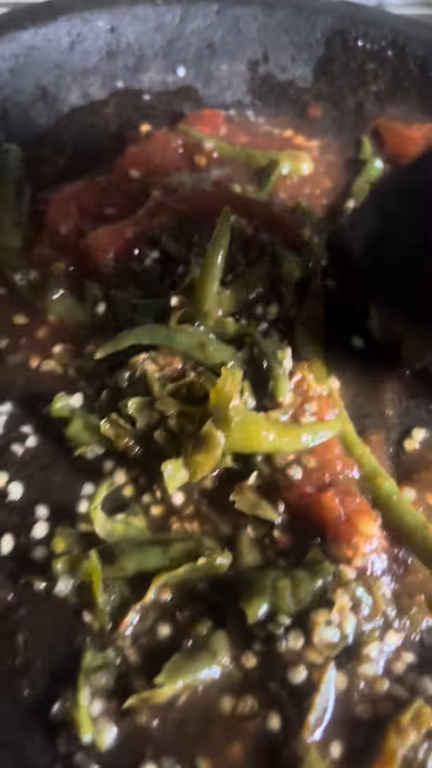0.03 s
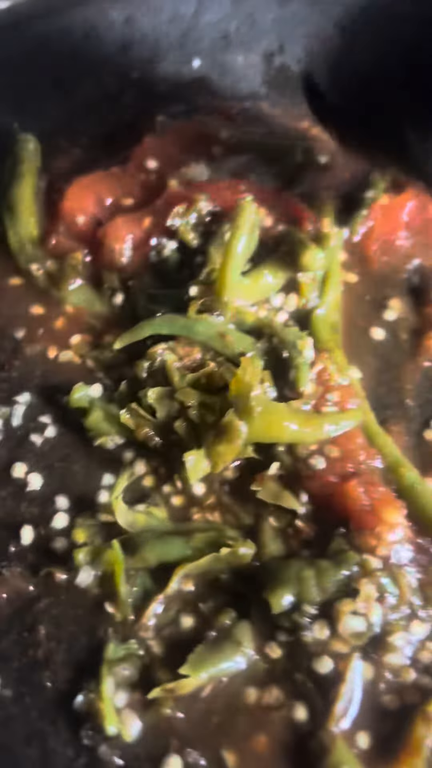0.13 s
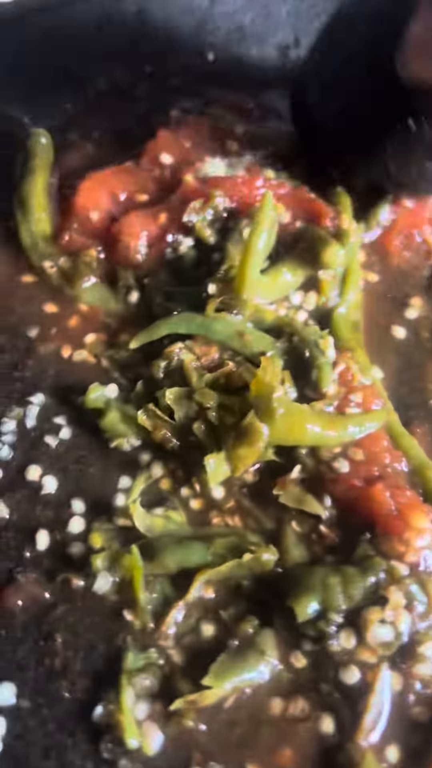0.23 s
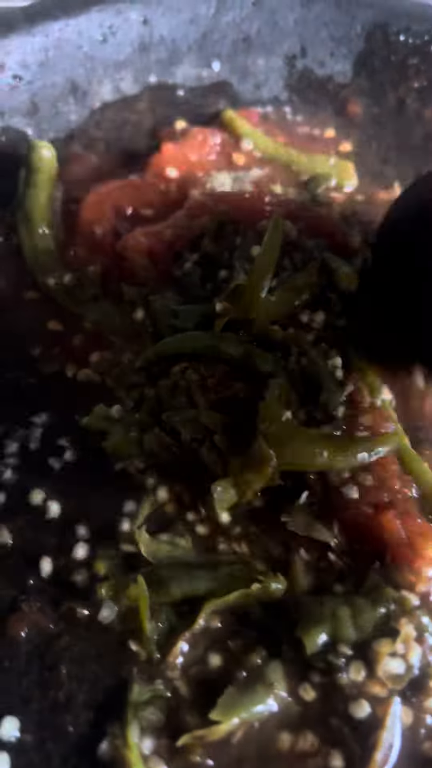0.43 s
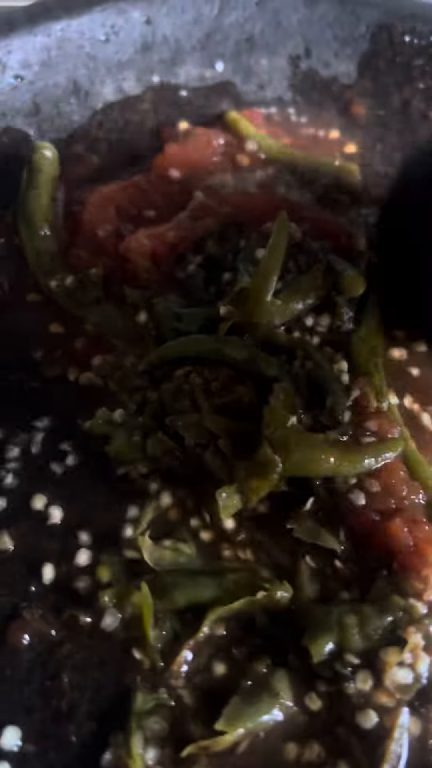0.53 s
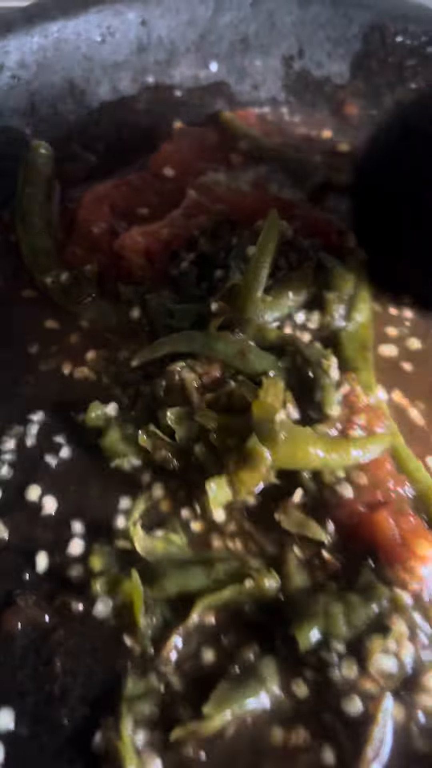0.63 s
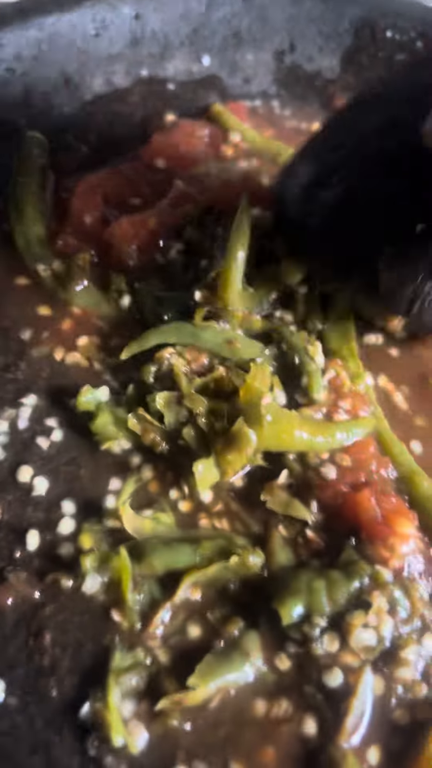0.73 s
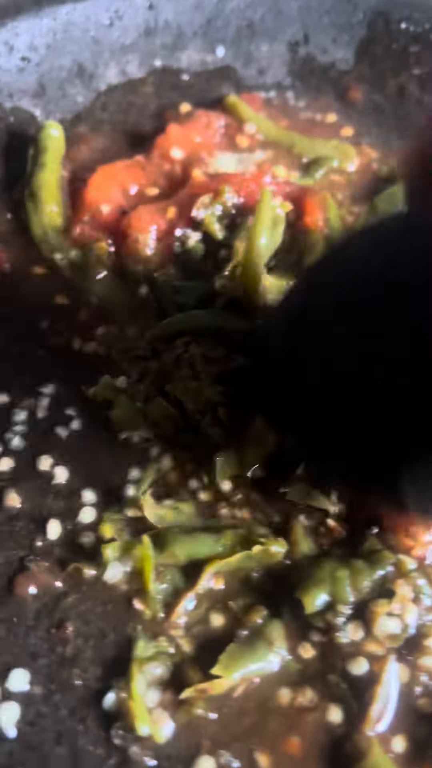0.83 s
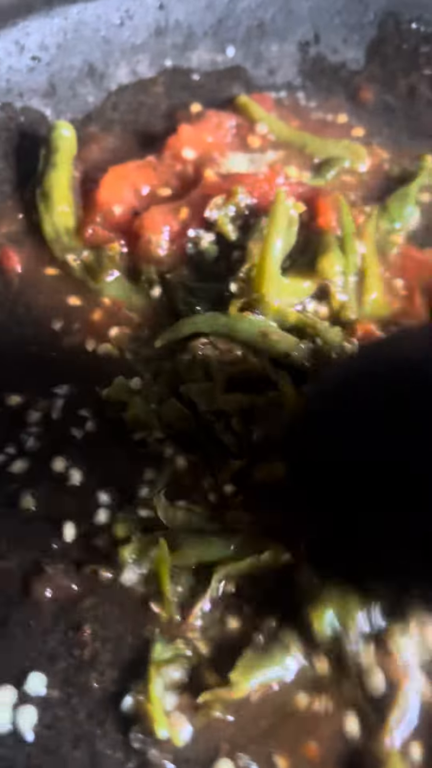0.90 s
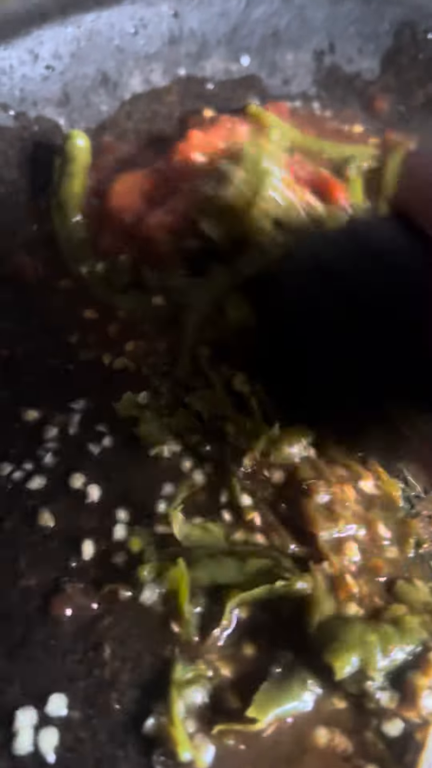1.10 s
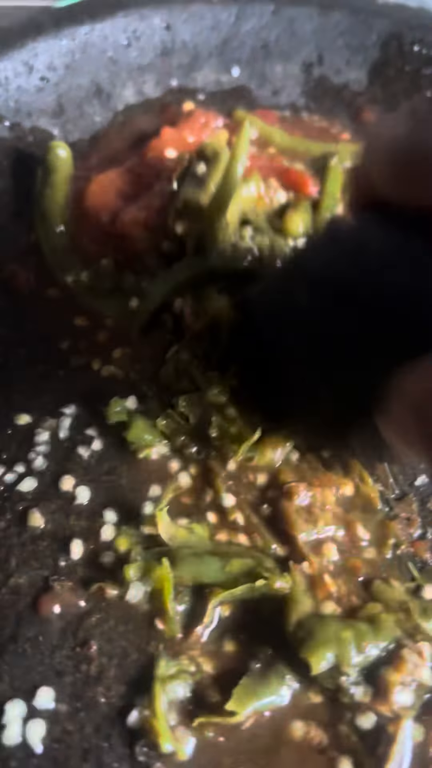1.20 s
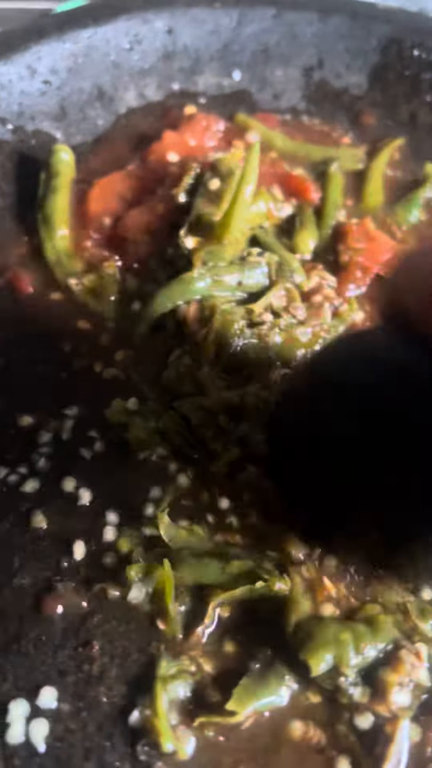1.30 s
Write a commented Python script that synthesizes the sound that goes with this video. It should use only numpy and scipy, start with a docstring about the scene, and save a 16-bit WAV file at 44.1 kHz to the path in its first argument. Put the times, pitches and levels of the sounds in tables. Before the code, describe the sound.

Stone mortar grinding: one sharp clack with a deep thud, then squishy, gritty rubbing and wet pops

```python
"""Kitchen: a stone pestle clacks down in a stone mortar, thumps the surface under it and grinds boiled vegetables.
Each of two strokes is grit noise through stone resonances over noise through low modes (rumble).
Wet squishes and crackle are random impulses coloured as pulp; pops are tiny cracks with a short ring.
Clack and thumps ring decaying modes; the close mix adds room and bowl reflections, motor hum and air."""
import sys
import numpy as np
from scipy import signal
from scipy.fft import rfft, irfft, next_fast_len
from scipy.io import wavfile
from scipy.ndimage import uniform_filter1d, map_coordinates

SR = 44100
rng = np.random.default_rng(int(sys.argv[2]) if len(sys.argv) > 2 else 0)


def master(y):
    """Save y as 16-bit WAV."""
    cut = np.clip(np.atleast_2d(y).T, -1, 1)
    pcm = np.round(cut * 32767)  # scale
    wavfile.write(sys.argv[1], SR, pcm.astype(np.int16))


N = 59535

# colour of wet pulp [f/Hz, level/dB]
PULP = [(600, -18.5), (1500, 6), (3000, 0.5), (4300, 0), (5200, 1), (6500, 0), (8500, 3.5), (10200, -9),
        (12500, -1.5), (15500, -1)]
ROOM_DB = -16.5


def amp(db):
    """dB to linear gain."""
    return 10 ** (np.asarray(db) / 20)


def unit(x):
    """Scale to rms 1."""
    return x / np.sqrt(np.mean(x ** 2) + 1e-20)


def clock():
    """Sample times in s."""
    return np.arange(N) / SR


def grid():
    """Frequencies of the padded spectrum in Hz."""
    return np.fft.rfftfreq(2 * next_fast_len(N), 1 / SR)


def along(points, f_hz):
    """Interpolate [f/Hz, value] points on a log-frequency axis."""
    f_points, values = np.transpose(points)
    return np.interp(np.log(f_hz + 1), np.log(f_points + 1), values)


def level(rows):
    """Gain per sample from [t/s, level/dB] points."""
    return amp(np.interp(clock(), *np.transpose(rows)))


def wobble(knots_per_s):
    """Random curve, straight between normally distributed knots."""
    return map_coordinates(rng.standard_normal(N), [clock() * knots_per_s], order=1)


def filtered(x, response):
    """Apply a frequency response given on the grid."""
    return irfft(rfft(x, 2 * next_fast_len(N)) * response)[..., :N]


def colour(points):
    """Minimum-phase response through [f/Hz, level/dB] points, by folding the cepstrum."""
    cepstrum = irfft(np.log(amp(along(points, grid()))))
    half = len(cepstrum) // 2
    cepstrum[1:half] *= 2
    cepstrum[half + 1:] = 0
    return np.exp(rfft(cepstrum))


def resonances(rows):
    """Sum of second-order band-pass peaks [f/Hz, width/Hz, level/dB]."""
    f = grid()
    return sum(amp(db) * 1j * f * w / (c * c - f * f + 1j * f * w) for c, w, db in rows)


def decay(start_s, t60_s):
    """Exponential decay, zero before start_s."""
    age = clock() - start_s
    return (age >= 0) * np.exp(-np.log(1000) * np.abs(age) / t60_s)


def grains(per_s, spread_db):
    """Sparse random-sign impulses of uneven size, rms 1."""
    size = amp(spread_db * np.minimum(rng.exponential(size=N), 4))
    hits = rng.random(N) < per_s / SR
    return unit(hits * size * rng.choice([-1, 1], N))


def rasp(effort, tone, stone):
    """Grit catches and slips between the stones and rings them; the ring shifts as the pestle travels."""
    grit_per_s, grit_spread_db = 5000, 4
    chatter_db, chatter_per_s = 2, 370
    swing_db, swing_per_s = 4.5, 43  # ring swells and fades as the contact point moves
    grit = grains(grit_per_s, grit_spread_db) * amp(chatter_db * wobble(chatter_per_s))
    grit = unit(grit) * level(effort)
    centre_s = np.average(clock(), weights=level(effort) ** 2)
    travel_s = np.clip(clock() - centre_s, -.5, .5)

    body = colour(tone)
    sound, whole = filtered(grit, body), body
    for f_hz, width_hz, db, growth_db_per_s in stone:
        ring = resonances([(f_hz, width_hz, db)]) * body / np.abs(body)  # keep the body's phase only
        swell_db = growth_db_per_s * travel_s + swing_db * wobble(swing_per_s)
        sound = sound + filtered(grit, ring) * amp(swell_db)
        whole = whole + ring
    return sound / np.sqrt(np.mean(np.abs(whole) ** 2))


def rumble(effort, modes, top_hz):
    """The pestle rides over the pitted bowl and shakes the support."""
    low_pass = 1 / (1 + (grid() / top_hz) ** 4)
    shake = filtered(rng.standard_normal(N), resonances(modes) * low_pass)
    running_rms = np.sqrt(np.abs(uniform_filter1d(shake ** 2, size=1200)) + 1e-12)
    return shake / running_rms * level(effort)


def light_stroke():
    """Light stroke cushioned by pulp: returns its rasp and its rumble."""
    # rasp effort [t/s, level/dB]
    rasp_effort = [(0, -72), (.06, -85), (.4, -65), (.435, -55), (.45, -49), (.48, -52.5), (.51, -41),
                   (.545, -45), (.59, -61.5), (.63, -71), (.68, -58.5), (.72, -87)]
    # rasp colour [f/Hz, level/dB]
    body_points = [(100, -27), (300, 0), (800, 0.5), (1300, -6.5), (1800, -8), (2700, -8), (3400, -17.5),
                   (5000, -24.5), (7000, -14), (9500, -18), (15000, -50)]
    # mortar and pestle resonances [f/Hz, width/Hz, level/dB, growth/(dB/s)]
    stone_modes = [(920, 26, -5, 0), (1370, 81, 4.5, 14), (2226, 140, -6, -3), (4370, 340, -10, 13),
                   (6800, 150, -8.5, -2)]
    # rumble effort [t/s, level/dB]
    rumble_effort = [(0, -44), (.03, -41), (.08, -54.5), (.2, -57), (.42, -45.5), (.47, -27), (.5, -43),
                     (.54, -30.5), (.62, -44), (.69, -45.5), (.78, -61), (.96, -61), (1.05, -83)]
    # rumble resonances [f/Hz, width/Hz, level/dB]
    rumble_modes = [(66, 12, -32), (102.1, 8, 8.5), (120.4, 7.3, 2.5), (154, 7.9, -14), (204.6, 8.3, -11.5)]
    return rasp(rasp_effort, body_points, stone_modes), rumble(rumble_effort, rumble_modes, top_hz=352)


def firm_stroke():
    """Firm stroke on bare stone: returns its rasp and its rumble."""
    # rasp effort [t/s, level/dB]
    rasp_effort = [(.95, -100), (.985, -55), (1.012, -43.5), (1.05, -43.5), (1.11, -45), (1.16, -54.5),
                   (1.192, -44), (1.229, -47.5), (1.238, -33.5), (1.252, -36.5), (1.259, -42), (1.276, -39),
                   (1.305, -65.5), (1.35, -43.5)]
    # rasp colour [f/Hz, level/dB]
    body_points = [(100, -6), (300, 0.5), (700, -3.5), (1300, 0.5), (1800, -0.5), (2700, 2), (3400, -7.5),
                   (4400, -3), (5000, -36), (6000, -2), (7200, -21), (9500, -21.5), (12000, -18),
                   (15000, -21)]
    # mortar and pestle resonances [f/Hz, width/Hz, level/dB, growth/(dB/s)]
    stone_modes = [(667, 88, 10, 5.5), (880, 67, 2.5, -2), (1299, 52, 4.5, 1), (2167, 74, -7.5, 13.5),
                   (2337, 110, 7.5, 27), (2580, 57, -9, 17), (4160, 140, -5.5, -24), (6280, 120, 3, 24),
                   (6590, 200, 0, -8)]
    # rumble effort [t/s, level/dB]
    rumble_effort = [(.96, -78), (.99, -49.5), (1.015, -26), (1.08, -36.5), (1.12, -35), (1.16, -45),
                     (1.2, -32), (1.25, -44), (1.28, -31.5), (1.35, -40.5)]
    # rumble resonances [f/Hz, width/Hz, level/dB]
    rumble_modes = [(66, 8.2, -3.5), (118.5, 8.1, 7), (201, 14, -12.5), (224, 11, -16), (303.4, 6.7, -2.5),
                    (360, 6.1, -12)]
    return rasp(rasp_effort, body_points, stone_modes), rumble(rumble_effort, rumble_modes, top_hz=584)


def clack():
    """Stone meets stone: a few very short modes, and a brief splash of pulp."""
    # stone modes [f/Hz, level/dB, t60/s]
    stone_modes = [(1910, -13.5, 0.018), (4430, 4, 0.0064), (5820, 4.5, 0.0056), (8060, 6, 0.011),
                   (8520, 3.5, 0.01), (12250, -5, 0.0085), (14300, -4, 0.0051)]
    # splash colour [f/Hz, level/dB]
    splash_points = [(500, -6.5), (1900, -8.5), (3000, -6.5), (4200, -4.5), (5000, -6), (7000, -6.5),
                     (8200, 2.5), (9800, -7), (12400, -6), (15500, -27)]
    land_s, clack_db = .2074, -20.5
    contact_s = 0.00066  # ring 98 % built up
    splash_db, splash_t60_s, splash_room_db = -6.5, 0.038, -10

    age = np.maximum(clock() - land_s, 0)
    stone = sum(amp(db) * np.sin(2 * np.pi * hz * age) * decay(land_s, t60) for hz, db, t60 in stone_modes)
    stone = stone * (1 - np.exp(-(2 * age / contact_s) ** 2))
    noise = unit(filtered(rng.standard_normal(N), colour(splash_points)))
    splash = amp(splash_db) * decay(land_s, splash_t60_s) * noise
    return amp(clack_db) * (stone + in_room(splash, splash_room_db))


def thumps():
    """Blows run through the support as bending waves, highs first, and leave its modes ringing."""
    # blows into the support [t/s, level/dB, softness corner f/Hz]
    blow_rows = [(0.2069, 2, 1410), (0.4301, -21, 300), (0.4413, -16.5, 1400), (.983, -27.5, 806),
                 (.998, -18, 450), (1.0117, -12, 284), (1.18, -20.5, 600), (1.264, -21.5, 600)]
    # colour of the first push [f/Hz, level/dB]
    push_points = [(30, -37.5), (60, -10.5), (100, 1.5), (140, 4), (200, -5), (290, -19.5), (400, -22),
                   (560, -21), (800, -29.5), (1280, -22), (1550, -62), (4000, -89)]
    # support modes [f/Hz, level/dB, t60/s]
    support_modes = [(62.2, -26, 0.54), (118.5, -13.5, 0.28), (135, -27.5, 0.28), (164.7, -39, 0.1),
                     (191.2, -30, 0.53), (237.8, -34, 0.28), (290, -41, 0.4), (350.6, -36, 0.28),
                     (404, -52.5, 0.56), (537, -31.5, 0.15)]
    push_db, travel_s, spread_s = 35, .004, .015  # spread: extra delay at 100 Hz
    lag_s, rise_s = .016, 0.017  # of the ringing modes
    room_db, room_top_hz = -4, 594

    f = grid()
    blows = sum(amp(db) * np.exp(-2j * np.pi * f * s) / (1 + (f / hz) ** 4) for s, db, hz in blow_rows)
    bending = np.exp(-2j * np.pi * (f * travel_s + 2 * 10 * spread_s * np.sqrt(f)))
    push = amp(push_db) * irfft(blows * bending * colour(push_points))[:N]
    boom = filtered(push, 1 / (1 + (f / room_top_hz) ** 4))

    age = np.maximum(clock() - lag_s, 0)
    ring = sum(amp(db) * np.sin(2 * np.pi * hz * age) * decay(lag_s, t60) for hz, db, t60 in support_modes)
    ring = ring * (1 - np.exp(-age / rise_s))
    return push - boom + in_room(boom, room_db) + filtered(ring, blows)


def squishes():
    """Wet pulp fizzes as it is pressed out from under the pestle."""
    # pulp squeezed out [peak t/s, level/dB, rise/s, fall/s, centre f/Hz]
    squish_rows = [(.27, -63.5, 0.07, 0.23, 2630), (.375, -55.5, 0.11, 0.15, 5100),
                   (.52, -67, 0.045, 0.14, 6960), (0.679, -47, 0.066, 0.028, 4960),
                   (.695, -61, .07, 0.032, 13500), (0.877, -57, 0.029, 0.028, 5370),
                   (0.919, -62, 0.083, 0.22, 2260), (.93, -66, 0.08, 0.049, 7500),
                   (1.047, -49, 0.025, 0.1, 8400), (1.201, -46, 0.02, 0.055, 8200),
                   (1.256, -50.5, 0.052, 0.054, 6020), (1.345, -65, 0.03, 0.089, 6500)]
    pulp_per_s, pulp_spread_db = 2500, 2
    swell_db = 19.5  # level change over one rise or fall time
    focus_db = 9.5  # spectrum drop one octave from the centre
    out, t, pulp = np.zeros(N), clock(), colour(PULP)
    for peak_s, db, rise_s, fall_s, centre_hz in squish_rows:
        focus = amp(-focus_db * np.log2((grid() + 1) / centre_hz) ** 2)
        fizz = unit(filtered(grains(pulp_per_s, pulp_spread_db), pulp * focus))
        distance = np.maximum((peak_s - t) / rise_s, (t - peak_s) / fall_s)
        out += fizz * amp(db - swell_db * distance)
    return out


def pops():
    """Skins, seeds and bubbles pop: each a tiny crack with a few cycles of ring."""
    # pops [t/s, level/dB, pitch f/Hz, t60/s]
    pop_rows = [(0.458, -34.5, 6000, 0.0085), (0.5937, -24.5, 7020, 0.0053), (0.608, -30, 11300, 0.0039),
                (0.684, -32.5, 7900, 0.011), (0.6949, -33, 4800, 0.0044), (.712, -48, 7600, 0.0029),
                (0.7421, -43, 6000, 0.017), (0.8694, -39, 2154, 0.017), (0.993, -44.5, 6770, 0.0065),
                (1.0093, -34, 4330, 0.022), (1.0491, -28, 7160, 0.03), (1.136, -33, 7450, 0.012),
                (1.144, -29, 8400, 0.006), (1.1694, -27.5, 7340, .005), (1.2049, -24, 8020, 0.0068),
                (1.318, -34, 6520, 0.01), (1.3295, -36, 5750, 0.0077), (1.347, -33, 4150, 0.0046)]
    ring_over_crack, width_over_pitch = 0.85, 0.58
    out, t = np.zeros(N), clock()
    for s, db, hz, t60 in pop_rows:
        crack_band = resonances([(hz, width_over_pitch * hz, 0)])
        crack = unit(filtered(rng.standard_normal(N), crack_band))
        ring = ring_over_crack * np.sin(2 * np.pi * hz * (t - s))
        pop = decay(s, t60) * (crack + ring)
        out += .5 * amp(db) * filtered(pop, resonances([(hz, hz, 0)]))
    return out


def crackle():
    """Sparse ticks of tearing wet skins between the louder pops."""
    # crackle [t/s, level/dB]
    crackle_rows = [(0, -76), (.2, -113), (.44, -83), (.62, -60.5), (.7, -66), (.77, -76), (.97, -79),
                    (1.05, -46.5), (1.14, -53.5), (1.21, -73), (1.3, -80), (1.35, -58)]
    per_s, spread_db = 450, 1
    treble_tilt = grid() / (grid() + 5000)
    ticks = filtered(grains(per_s, spread_db), colour(PULP) * treble_tilt)
    return unit(ticks) * level(crackle_rows)


def in_bowl(x):
    """Quick reflections off the mortar's wall, different at each port."""
    bowl_db, bowl_t60_s, lower_edge_hz = -11, 0.074, 4000
    wall = rng.standard_normal((2, N)) * decay(0, bowl_t60_s)
    echo = signal.fftconvolve(x[None], wall / np.linalg.norm(wall[0]), axes=1)[:, :N]
    return amp(bowl_db) * filtered(echo, grid() / (grid() + lower_edge_hz))


def in_room(x, wet_db):
    """Direct sound plus the kitchen's answer at both ports: noise decaying at a rate set by frequency."""
    # kitchen decay [f/Hz, t60/s]
    decay_points = [(100, 0.19), (500, 0.43), (1000, 0.45), (2000, 0.37), (5000, 0.23), (8000, 0.32),
                    (15000, 0.1)]
    alike_hz = 420  # below this the ports get the same reverberation
    hz, t, noise = signal.stft(rng.standard_normal((2, SR // 2)), SR, nperseg=256)
    t60_s = along(decay_points, hz)[:, None]
    tail = signal.istft(noise * np.exp(-np.log(1000) * t / t60_s), SR, nperseg=256)[1]
    left, other = signal.fftconvolve(x[None], tail / np.linalg.norm(tail[0]), axes=1)[:, :N]
    alike = 1 / (1 + (grid() / alike_hz) ** 4)
    right = filtered(left, alike) + filtered(other, np.sqrt(1 - alike ** 2))
    return x + amp(wet_db) * np.array([left, right])


def background():
    """A motor's hum as steady sines, and the still air of the kitchen as coloured noise."""
    # hum partials [f/Hz, rms level/dB]
    hum_rows = [(48.4, -46.5), (96.9, -77), (247.6, -81)]
    # air colour [f/Hz, level/dB]
    air_points = [(20, -51.5), (55, 19), (150, -12.5), (300, -22), (600, -30.5), (1100, -26.5), (1900, -11),
                  (2800, -32), (3500, -28.5), (5000, -36), (15000, -41)]
    air_db = -59
    hum = np.zeros(N)
    for hz, db in hum_rows:
        hum += np.sqrt(2) * amp(db) * np.sin(2 * np.pi * (hz * clock() + rng.random()))
    air = unit(filtered(rng.standard_normal(N), colour(air_points)))
    return hum + in_room(amp(air_db) * air, ROOM_DB)


def scene():
    """Sum all sources; the grinding also gets room and bowl reflections."""
    light_scrape, light_shake = light_stroke()
    firm_scrape, firm_shake = firm_stroke()
    shake = light_shake + firm_shake
    grind = light_scrape + firm_scrape + squishes() + pops() + crackle()
    return clack() + thumps() + shake + in_room(grind, ROOM_DB) + in_bowl(grind) + background()


def record(dry):
    """Two ports that differ a little in level and phase, band-limited at both ends."""
    # port balance [f/Hz, left minus right/dB]
    balance_points = [(30, 1.5), (60, 1.5), (130, 1.4), (330, 5), (700, 1.5), (1300, -1.3), (3000, 1.1),
                      (12000, -0.5)]
    # port phase [f/Hz, left lead/rad]
    lead_points = [(100, 0), (1000, -0.86), (2300, 0.3), (4300, -0.55), (5300, -0.97), (6500, -1.47),
                   (13000, -1.54)]
    low_cut_hz, top_hz = 15, 16000
    f, side = grid(), np.array([[.5], [-.5]])
    ports = amp(side * along(balance_points, f)) * np.exp(1j * side * along(lead_points, f))
    low_cut = 1 - 1 / (1 + (f / low_cut_hz) ** 6)
    return filtered(dry, ports * low_cut / (1 + (f / top_hz) ** 80))


dry = scene()
out = record(dry)
master(out)
```